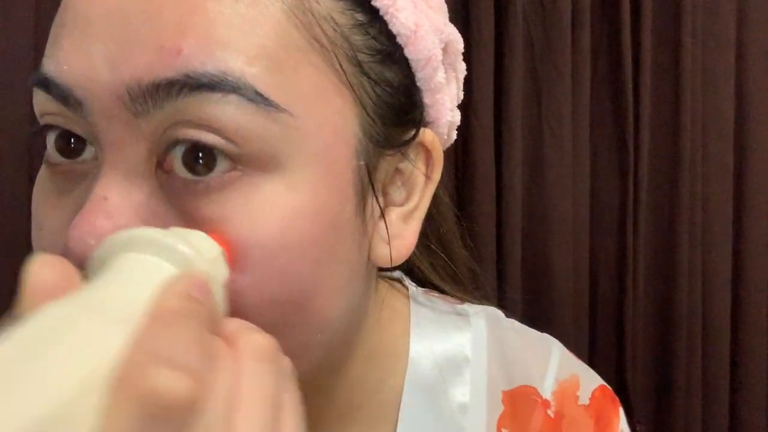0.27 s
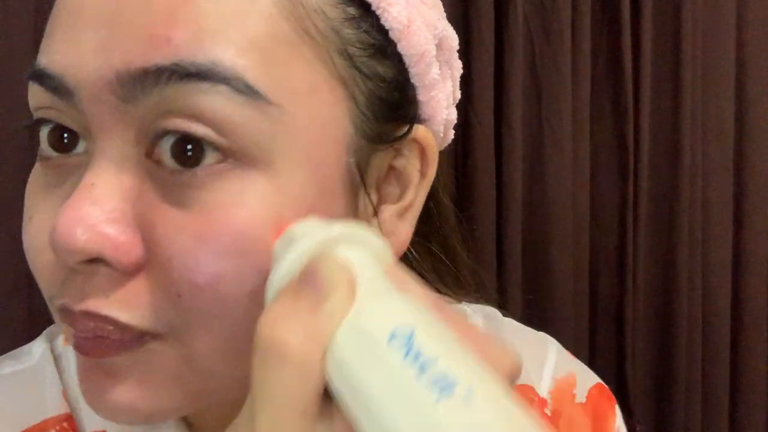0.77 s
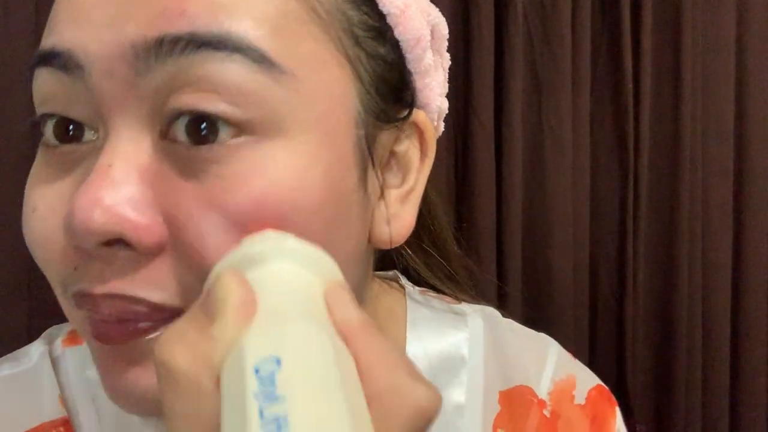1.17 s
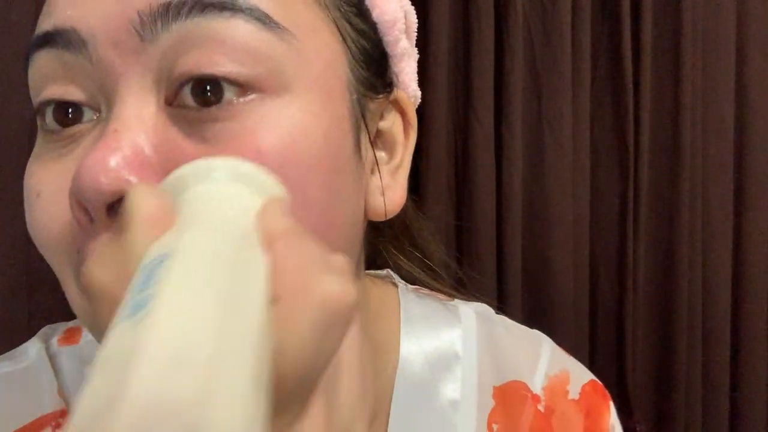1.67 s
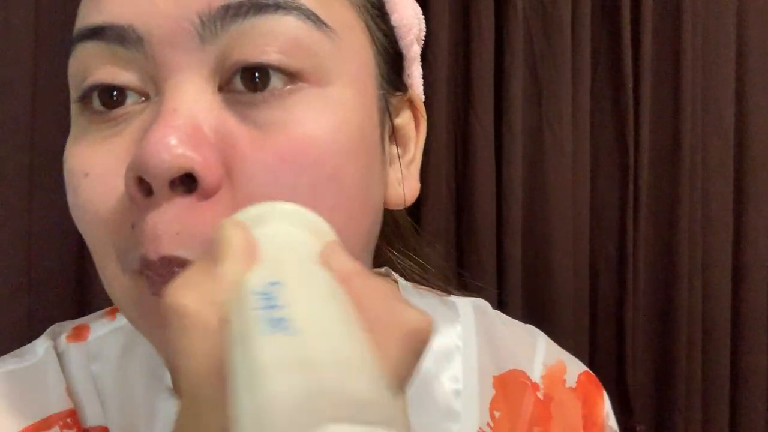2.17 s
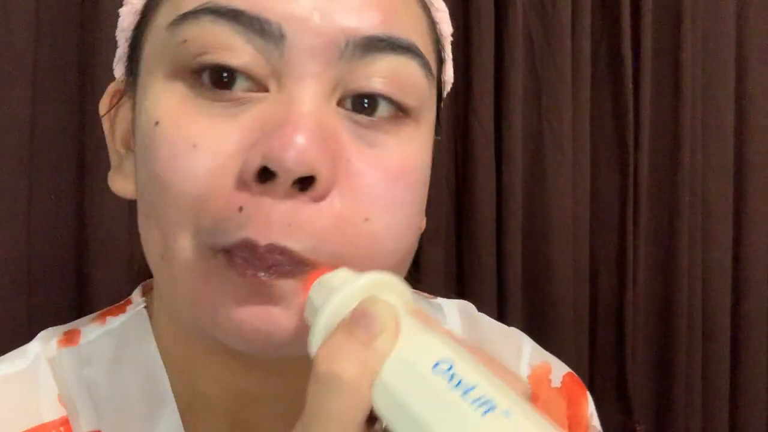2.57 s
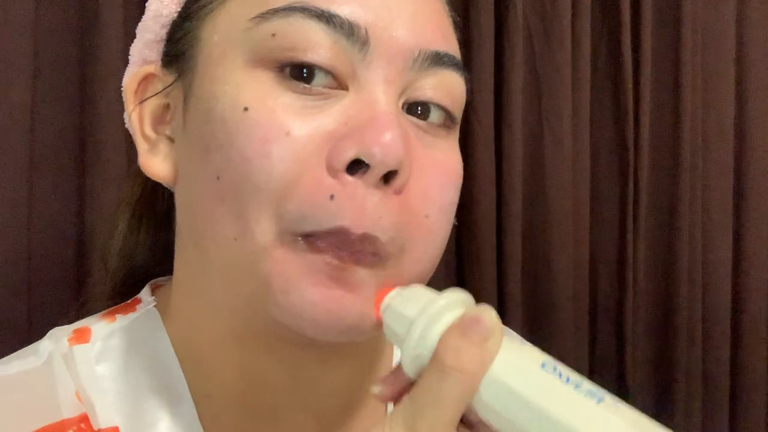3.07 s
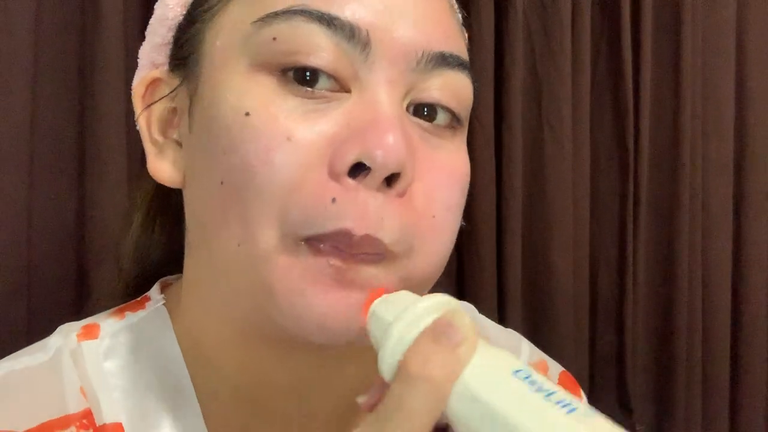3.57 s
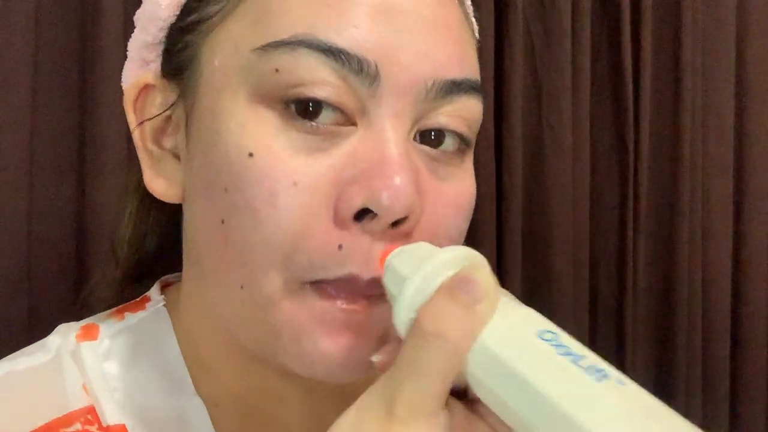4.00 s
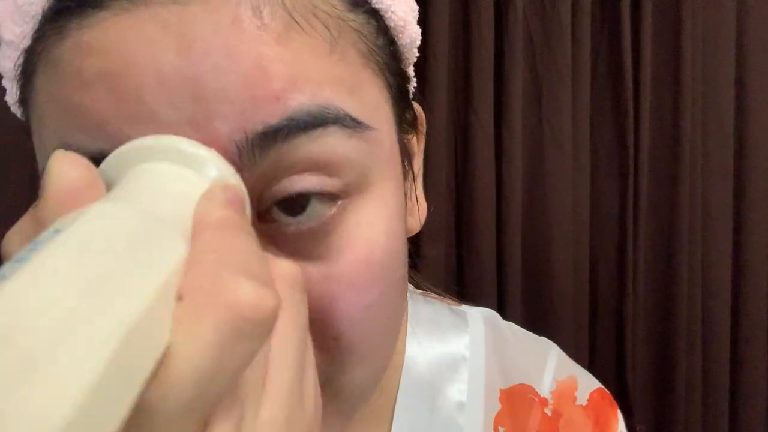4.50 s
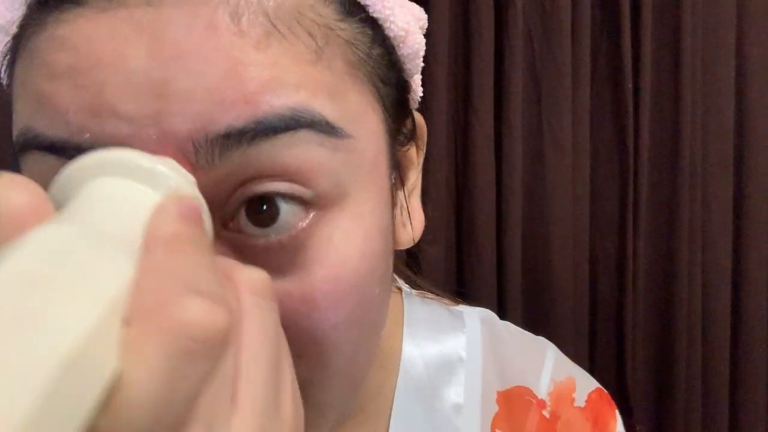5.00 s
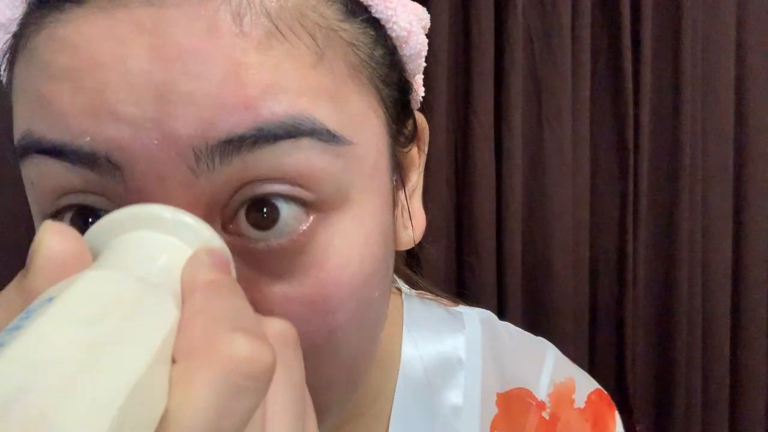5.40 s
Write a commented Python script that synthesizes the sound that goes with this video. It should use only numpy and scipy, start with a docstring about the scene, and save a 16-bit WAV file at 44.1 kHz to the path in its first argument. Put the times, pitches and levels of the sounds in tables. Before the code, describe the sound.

A high-frequency facial wand buzzes close to a phone in a small curtained room. Sixty dry, bright ticks a second fuse into a steady rasp, swelling to rough crackle whenever the glass lifts off the cheek. The chin passage is steadier and thinner; then, after a cut to the brow, the buzz is rougher, with renewed flares. Faint rumble and hiss lie beneath.

```python
"""Over a faint low rumble and hiss, a dry, bright buzz of ticks begins almost at once: a high-frequency
facial wand moves over cheek, chin and brow, close to a phone in a small curtained room. Its coil fires once
per mains cycle: filtered impulses tick while the glass rests on the skin and swell to a rough crackle where
a gap opens and sparks jump. Delayed copies from face and hand colour each tick; filtered noise makes the
rumble, hiss and soft rubs, and short damped tones make the handling knocks."""
import sys
import numpy as np
from scipy import signal
from scipy.fft import rfft, irfft
from scipy.io import wavfile
from scipy.ndimage import map_coordinates

SR = 44100
rng = np.random.default_rng(int(sys.argv[2]) if len(sys.argv) > 2 else 0)


def generate_wav(sig):
    """Save sig (samples, or channels by samples) to the path in sys.argv[1] as 16-bit PCM at SR."""
    pcm = np.round(np.clip(np.atleast_2d(sig).T, -1, 1) * 32767).astype(np.int16)
    wavfile.write(sys.argv[1], SR, pcm)


N = 249165

MAINS_HZ = 59.9593
# strength of the discharge while the glass rests on the skin, and the most that an open gap adds (dB)
FACE_DB, BROW_DB, GAP_GAIN_DB = -39.5, -40.5, 15.5
# slow wavering of the discharge with the pressure of the hand: spread (dB), rate (per s)
WAVER_DB, WAVER_RATE = .6, 28
# firing-to-firing scatter, and echoes from face and hand on cheek and chin (dB)
SCATTER_DB, NEAR_DB = .7, -18.5
# amplitude of side streamers beside the main spark: on cheek and chin, and on the brow
FACE_BRANCH, BROW_BRANCH = .12, .2
# creeping discharges under the main snap, on face and brow with no gap (dB), and their mean delay (s)
FACE_CRACKLE_DB, BROW_CRACKLE_DB, CREEP_S = -19.5, -15, .0005
# how far the turning wand shifts the skew between the ports (share), and how often (per s)
TURN_SHARE, TURN_RATE = .2, 7
# the nearest wall's answer to the snaps on the brow: delay (s), level (dB)
WALL_S, WALL_DB = .009, -22
ROOM_T60_S = .25
TOP_HZ = 16450

# background rumble of the room: frequency_hz, relative_density_db (per Hz)
RUMBLE_COLOUR = [(20, -10.5), (55, 4.5), (85, -5.5), (135, 1.5), (200, -2.5), (270, -10.5), (360, -15),
                 (700, -18), (1500, -20.5), (4000, -31), (16000, -24)]
# faint steady hiss: frequency_hz, relative_density_db (per Hz)
HISS_COLOUR = [(1000, -30), (3000, -16), (5500, -9), (8000, 0), (11000, 0), (16000, -3)]
# firing on cheek and chin, then on the brow: start_s, end_s
FACE_SPAN = (.014, 4.155)
BROW_SPAN = (4.1589, 5.66)
# opening and settling of the gap between glass and skin: widest_s, opening_s, closing_s, relative_gap
# (the gain levels off above a gap of 1)
GAP_OPENINGS = [(.168, 0.025, 0.058, 1), (.28, 0.035, 0.043, 0.22), (.797, 0.031, 0.082, 0.63),
                (1.246, 0.021, 0.27, 0.2), (1.429, 0.01, 0.013, 0.94), (1.595, 0.046, 0.074, 1.94),
                (1.696, 0.02, 0.015, 0.76), (1.84, 0.04, 0.043, 2.4), (2.293, 0.018, 0.035, 0.99),
                (2.736, 0.12, 0.073, 0.15), (3.06, 0.23, 0.064, 0.21), (3.29, .025, 0.038, 0.23),
                (3.39, 0.081, 0.1, 0.27), (3.689, 0.1, 0.23, 0.18), (4.045, 0.096, 0.068, 0.36),
                (4.272, 0.065, 0.03, 0.65), (4.37, 0.053, 0.091, 0.55), (4.476, .008, 0.012, 0.18),
                (4.66, 0.059, 0.073, 0.62), (4.81, 0.089, 0.052, 0.69), (4.995, 0.043, 0.1, 0.6),
                (5.25, 0.06, 0.059, 0.099), (5.44, 0.14, 0.17, 2.4)]
# spectrum of a tick with the glass at rest on each place: frequency_hz, relative_level_db
CHEEK_TICK = [(400, -42.5), (700, -33.5), (1100, -19.5), (1850, -22), (2400, -16), (2900, -14.5),
              (4300, -9.5), (5400, -11.5), (7600, 1), (10000, 6.5), (12700, 4), (15200, 5.5), (16400, -5)]
CHIN_TICK = [(400, -62), (700, -32), (1100, -25), (1800, -26), (2350, -23), (2850, -19.5), (3500, -23),
             (5300, -12), (6500, -9.5), (7600, -0.5), (10000, 2.5), (12700, 3.5), (15200, 5.5),
             (16400, -5.5)]
BROW_TICK = [(400, -37), (700, -22), (1100, -19), (1850, -22.5), (2900, -13), (4300, -12), (5800, -5),
             (7600, -1.5), (10000, 3), (12700, 0.5), (15200, 6), (16400, -0.5)]
# spectrum of an open spark in each place: frequency_hz, relative_level_db
CHEEK_SPARK = [(400, -101), (700, -26), (1100, -29), (1800, -47), (2900, -22), (4300, -13), (5600, -19),
               (7600, 7), (10000, 12.5), (12700, 22), (15200, 10.5), (16400, -7.5)]
BROW_SPARK = [(400, -46), (700, -30), (1100, -22.5), (1850, -23), (2900, -17), (4300, -10.5), (5800, -15),
              (7600, -8), (10000, -3), (12700, 4), (15200, 2), (16400, -10)]
# spectrum of the tiny discharges creeping over the skin: frequency_hz, relative_level_db
CREEP_COLOUR = [(400, -40), (1100, -12), (2300, -3), (3500, 0), (6000, 0), (7500, 0), (10000, -5),
                (16400, -8)]
# resonances of the plastic handle: frequency_hz, width_hz, level_db (before each place's handle_db)
HANDLE_MODES = [(1000, 230, 0.5), (1402, 300, 5), (2307, 203, 4), (3090, 350, -1), (4380, 490, -3.5)]
# slide of the wand from cheek to chin: start_s, end_s
SLIDE_S = (2.3, 2.8)
# body of the snaps, under their bright edge: time_s, gain_db
BODY_GAIN = [(0, -1), (.2, 0.5), (.3, 0.5), (.42, 1.5), (.65, -1), (.8, -2), (1.05, -0.5), (1.45, 0),
             (1.65, 0.5), (1.85, 0.5), (2.1, 1.5), (2.3, 0), (2.6, 1), (2.9, -2), (3.2, -0.5), (3.45, -1.5),
             (3.7, -1), (4.17, 0.5), (4.28, -3.5), (4.42, -1), (4.72, 0.5), (5.15, -0.1), (5.3, 0.5),
             (5.42, -7.5), (5.52, -0.5), (5.64, 4)]
# sizzle of the snaps: time_s, gain_db; and its band: low_hz, high_hz
SIZZLE_GAIN = [(0, 2), (.2, -6.5), (.5, 2.5), (.8, -2.5), (.95, 1), (1.2, 0), (1.35, -5), (1.55, 3.5),
               (1.66, 1), (2, 0), (2.12, 4), (2.27, 0.5), (2.4, 5), (2.52, -2.5), (2.7, 5.5), (2.85, 1.5),
               (3.55, -2), (3.8, 2.5), (3.9, -4), (4.14, -5.5), (4.17, 3), (4.35, .5), (4.8, -0.5),
               (5.3, 2), (5.64, -0.5)]
SIZZLE_HZ = (6100, 8500)
# flicker of the colour from snap to snap: low_hz, high_hz, spread_db
FLICKER_BANDS = [(1700, 3200, 1.4), (3200, 4600, 1.5), (4600, 6300, 1.8), (11500, 16000, .8)]
# bands of the ticks that slowly strengthen or thin out:
# strongest_s, rise_s, fall_s, low_hz, high_hz, gain_db
BAND_SWELLS = [(.12, .25, 0.23, 4100, 5870, 7), (1.08, 0.12, .22, 4600, 5300, -2),
               (2.2, 0.35, 0.28, 3960, 4760, 5.5), (2.75, .12, 0.22, 2700, 3050, -13),
               (3.25, .3, 0.4, 2780, 3120, -15), (3.3, 0.4, 0.57, 6400, 6830, 7),
               (3.98, .28, 0.36, 2550, 2970, -15), (4.05, 0.18, .2, 4000, 4270, 4.5)]
# phase between the phone's two ports: frequency_hz, right_lag_rad (negative lags are scaled by the skew)
PORT_PHASE = [(1900, 0), (2700, -1.8), (3400, -1.3), (4200, -1.2), (4900, -2.3), (5600, -2.4), (6400, -.5),
              (7200, .2), (8700, 3.14), (14650, 15.7), (15600, 17.6)]
# excess of the right port over the left: frequency_hz, level_db
PORT_BALANCE = [(500, 2), (1200, 1), (5000, 3.2), (8000, 1.3), (12000, 0)]
# knocks of handling: centre_s, pitch_hz, gaussian_width_s, peak_db
HANDLING_KNOCKS = [(.8915, 600, .0008, -48), (.902, 500, .0012, -54), (.917, 520, .0012, -55),
                   (1.396, 1570, .004, -60), (1.514, 560, .003, -54), (1.5166, 225, .0034, -33)]
# soft rubs round the mouth: strongest_s, rise_s, fall_s, level_db (before the grain)
RUBS = [(2.62, 0.06, 0.057, -60), (2.8, 0.18, 0.33, -69), (3.3, 0.24, 0.44, -69)]
# spectrum of the rubbing: frequency_hz, relative_density_db (per Hz)
RUB_COLOUR = [(150, -3.5), (400, -12.5), (650, -5.5), (1200, -15), (2000, -31), (4000, -50), (16000, -49)]
# lone snaps between the firings: time_s, level_db (before grip and mixing)
STRAY_SNAPS = [(4.402, -27), (4.418, -22), (4.435, -25), (5.287, -20)]


def undb(db):
    """Amplitude ratio: 20 decibels are a factor of ten."""
    return 10 ** (np.asarray(db) / 20)


def shape_db(points, hz):
    """Spectral envelope: levels interpolated on a log-frequency axis."""
    f, db = np.transpose(points)
    return np.interp(np.log(np.maximum(hz, 1)), np.log(f), db)


def curve_gain(points):
    """Amplitude envelope: decibel levels interpolated in time."""
    return undb(np.interp(np.arange(N) / SR, *np.transpose(points)))


def walk(t, rate):
    """Band-limited random fluctuation: a smooth wander of spread near 1, read at the times t."""
    knots = rng.standard_normal(int(N / SR * rate) + 3)
    return map_coordinates(knots, [t * rate], order=2, mode="nearest")


def swell(t, peak_s, rise_s, fall_s):
    """Asymmetric Gaussian envelope: one smooth movement from 0 up to 1 and back."""
    return np.exp(-((t - peak_s) / np.where(t < peak_s, rise_s, fall_s)) ** 2)


def passband(x, edges_hz, order=2):
    """Zero-phase band-pass filtering: one band of a sound, without delay."""
    return signal.sosfiltfilt(signal.butter(order, edges_hz, "band", fs=SR, output="sos"), x)


def noise(colour, channels=2):
    """Spectral shaping of white noise: independent channels of one colour, rms 1."""
    white = rng.standard_normal((channels, N))
    hz = np.arange(N // 2 + 1) * SR / N
    x = irfft(rfft(white) * undb(shape_db(colour, hz)), N)
    return x / np.std(x)


def room_tone(level_db, side_db):
    """Correlated background noise: a low, steady rumble, nearly the same at both ports."""
    mid, side = noise(RUMBLE_COLOUR)
    return (mid + undb(side_db) * side * np.array([[1], [-1]])) * undb(level_db)


def gap_db(t):
    """Breakdown across a gap: a wider gap gives a louder spark, up to what the coil can deliver."""
    gap = sum(width * swell(t, s, opening, closing) for s, opening, closing, width in GAP_OPENINGS)
    return GAP_GAIN_DB * np.tanh(gap)


def clicks(times, sizes, order=8):
    """Band-limited impulses: a windowed sinc places them between the samples."""
    at = np.ravel(times)[:, None] * SR
    taps = np.floor(at).astype(int) + np.arange(1 - order, order + 1)
    window = np.cos(np.pi / 2 * (taps - at) / order) ** 2
    weights = np.ravel(sizes)[:, None] * np.sinc(taps - at) * window
    inside = (taps >= 0) & (taps < N)
    return np.bincount(taps[inside], weights[inside], N)


def reflected(times, sizes, near_db, first_s=0.000494, reach_s=.0021, drift_s=.00008, hop_s=6e-6, count=14):
    """Early reflections off face, hand and phone: paths drift with the wand and hop at each new spark spot."""
    fade_db = 7
    out = clicks(times, sizes)
    for share in (np.arange(count) + rng.random(count)) / count:
        drift = drift_s * walk(times, 3)
        lag = first_s + reach_s * share + drift + hop_s * rng.standard_normal(len(times))
        polarity = np.sign(rng.standard_normal())
        out = out + clicks(times + lag, sizes * polarity * undb(near_db - fade_db * share))
    return out


def ring(x, colour, handle_db, late_s=0.0005007, late_below_hz=5500, size=2048):
    """Impulse response and modal resonance: a causal snap excites the handle; each impulse keeps its energy."""
    hz = np.arange(size // 2 + 1) * SR / size
    bass_cut = hz ** 2 / (hz ** 2 + 350 ** 2) + 0.00092
    # folding the cepstrum gives minimum phase
    cepstrum = irfft(np.log(undb(shape_db(colour, hz)) * bass_cut))
    cepstrum[1:size // 2] *= 2
    cepstrum[size // 2 + 1:] = 0
    modes = sum(undb(db + handle_db) * 1j * hz * w / (f ** 2 - hz ** 2 + 1j * hz * w)
                for f, w, db in HANDLE_MODES)
    # with late_s above 0, the body of the tick trails its bright edge
    delay_s = late_s / (1 + (hz / late_below_hz) ** 6)
    phase = 2 * np.pi * np.cumsum(delay_s) * SR / size
    snap = irfft(np.exp(rfft(cepstrum) - 1j * phase) * (1 + modes))[:size // 2]
    return signal.fftconvolve(x, snap / np.linalg.norm(snap))[:N]


def crackle(times, sizes, count=12):
    """Creeping surface discharge: tiny, equally strong, irregularly spaced pulses after every firing."""
    lags = CREEP_S * rng.exponential(size=(len(times), count))
    grains = sizes[:, None] * rng.choice([-1, 1], lags.shape) / np.sqrt(count)
    return ring(clicks(times[:, None] + lags, grains), CREEP_COLOUR, handle_db=-53, late_s=0)


def wand(span, contact_db, tick_colours, spark_colour, spark_from_db, branch, branch_s, near_db,
         handle_db, scatter_db, crackle_db, count=3):
    """Periodic discharge: a firing per mains cycle, its energy passing from ticks to branching sparks."""
    t = np.arange(*span, 1 / MAINS_HZ)
    level_db = contact_db + gap_db(t) + WAVER_DB * walk(t, WAVER_RATE)
    size = undb(level_db + scatter_db * rng.standard_normal(len(t))) * np.sqrt(SR / MAINS_HZ)
    sparking = .5 + .5 * np.tanh((level_db - spark_from_db) / 4)
    # the path to the phone changes slowly, and breakdown comes a few microseconds early or late
    t = t + 2e-5 * walk(t, 3.0) + 4e-6 * rng.standard_normal(len(t))
    ticks = reflected(t, size * np.sqrt(1 - sparking), near_db)
    spark_size = size * np.sqrt(sparking / (1 + count * branch ** 2))
    sparks = reflected(t, spark_size, near_db - 3)
    # thin, bright side streamers follow the main spark at random, within a fraction of a millisecond
    lags = np.cumsum(branch_s * rng.uniform(0.69, 1.67, (len(t), count)), axis=1)
    streamer_sizes = spark_size[:, None] * branch * (2 * rng.random(lags.shape) - 1)
    streamers = clicks(t[:, None] + lags, streamer_sizes)
    sparks = sparks + signal.lfilter(*signal.butter(1, 4000, "high", fs=SR), streamers)
    # both fire in the same instant, so where they blend their amplitudes add
    blend = np.interp(np.arange(N) / SR, t, np.sqrt(sparking) + np.sqrt(1 - sparking))
    resting = sum(share * ring(ticks, colour, handle_db) for colour, share in tick_colours)
    creeping = crackle(t, size * undb(crackle_db - 0.42 * gap_db(t)))
    return (resting + ring(sparks, spark_colour, handle_db)) / blend + creeping


def grip(x, split_hz, flicker_rate=48):
    """Time-varying band gain: body and sizzle swell apart from the bright edge, and the colour flickers."""
    t = np.arange(N) / SR
    body = signal.sosfiltfilt(signal.butter(4, split_hz, fs=SR, output="sos"), x)
    x = x + body * (curve_gain(BODY_GAIN) - 1)
    x = x + passband(x, SIZZLE_HZ) * (curve_gain(SIZZLE_GAIN) - 1)
    for low, high, db in FLICKER_BANDS:
        x = x + passband(x, [low, high]) * (undb(db * walk(t, flicker_rate)) - 1)
    return x


def band_swells(x):
    """Time-varying band gain: parts of the ticks' spectrum swell or hollow."""
    t = np.arange(N) / SR
    for s, rise, fall, low, high, db in BAND_SWELLS:
        x = x + passband(x, np.sort([low, high])) * (undb(db * swell(t, s, rise, fall)) - 1)
    return x


def ports(x, skew):
    """Phase and level difference at two receivers: the mid-range lag depends on where the wand is held."""
    hz = np.arange(N + 1) * SR / (2 * N)
    lag = np.interp(hz, *np.transpose(PORT_PHASE))
    lag = np.where(lag < 0, skew * lag, lag)
    right = undb(shape_db(PORT_BALANCE, hz) / 2)
    return irfft(rfft(x, 2 * N) * np.array([1 / right, right * np.exp(-1j * lag)]))[:, :N]


def turning(x, skew):
    """Interference of shifting phases: as the wand turns, a hollow drifts through the mid-range."""
    turn = .5 + .5 * np.tanh(walk(np.arange(N) / SR, TURN_RATE))
    return turn * ports(x, skew * (1 + TURN_SHARE)) + (1 - turn) * ports(x, skew * (1 - TURN_SHARE))


def spread(x, level_db, low_hz, high_hz, reach_s, count=4):
    """Scattering by hand and cheek: short, shifting mid-range paths, of opposite sign at the two ports."""
    n = np.arange(N)
    band = passband(x, [low_hz, high_hz], order=3)
    lags = reach_s * (np.arange(count) + rng.random(count)) / count
    paths = (np.interp(n - SR * (lag + .00012 * walk(n / SR, 23)), n, band) for lag in lags)
    side = sum(paths) / np.sqrt(count)
    return undb(level_db) * side * np.array([[1], [-1]])


def sway(x, path_s, rate=5):
    """Variable propagation delay: the moving hand keeps changing the path to the walls."""
    n = np.arange(N)
    return map_coordinates(x, [n + path_s * SR * walk(n / SR, rate)], order=5, mode="constant")


def room(x, wet_db, t60, curtain_hz, apart_db):
    """Diffuse reverberation: an exponential tail, mostly different at each port, dulled by the curtain."""
    t = np.arange(SR // 2) / SR
    shared, left, right = rng.standard_normal((3, len(t)))
    tail = shared + undb(apart_db) * np.array([left, right])
    tail = tail * undb(-60 * t / t60) * (1 - np.exp(-t / 0.0013))
    tail *= undb(wet_db) / np.linalg.norm(tail, axis=1, keepdims=True)
    dull = signal.lfilter(*signal.butter(1, min(curtain_hz, .45 * SR), fs=SR), x)
    return signal.fftconvolve(dull, tail, axes=1)[:, :N]


def bumps():
    """Heavily damped vibration: soft knocks of the wand in the hand, as tones in Gaussian envelopes."""
    t = np.arange(N) / SR
    return sum(undb(db) * np.exp(-.5 * ((t - s) / width) ** 2) * np.cos(2 * np.pi * hz * (t - s))
               for s, hz, width, db in HANDLING_KNOCKS)


def rubbing(grain_db):
    """Sliding friction: an uneven, dull rustle of noise."""
    t = np.arange(N) / SR
    slide = sum(undb(db) * swell(t, s, rise, fall) for s, rise, fall, db in RUBS)
    return noise(RUB_COLOUR, channels=1) * slide * undb(grain_db * walk(t, 30))


def wall(x):
    """Specular reflection: a single short slap from the nearest wall."""
    late = np.pad(x, (int(WALL_S * SR), 0))[:N]
    return undb(WALL_DB) * ports(sway(late, path_s=0.00023), skew=1.0)


def stray_snaps():
    """Extra breakdown: a few lone sparks on the brow between the regular firings."""
    times, snap_db = np.transpose(STRAY_SNAPS)
    return ring(clicks(times, undb(snap_db)), BROW_SPARK, handle_db=-2)


def scene():
    """Superposition: the wand on the lower face and then on the brow, with its reflections and room."""
    background = room_tone(level_db=-58.5, side_db=-14) + undb(-67) * noise(HISS_COLOUR)
    on_chin = np.interp(np.arange(N) / SR, SLIDE_S, (0, 1))
    face = wand(FACE_SPAN, FACE_DB, [(CHEEK_TICK, 1 - on_chin), (CHIN_TICK, on_chin)], CHEEK_SPARK,
                spark_from_db=-28.5, branch=FACE_BRANCH, branch_s=0.0001, near_db=NEAR_DB,
                handle_db=4, scatter_db=SCATTER_DB, crackle_db=FACE_CRACKLE_DB)
    brow = wand(BROW_SPAN, BROW_DB, [(BROW_TICK, 1)], BROW_SPARK,
                spark_from_db=-35.0, branch=BROW_BRANCH, branch_s=0.0001, near_db=NEAR_DB + 6.5,
                handle_db=2.5, scatter_db=SCATTER_DB, crackle_db=BROW_CRACKLE_DB)
    brow = brow + stray_snaps()
    face, brow = grip(np.array([face, brow]), split_hz=5900)
    face = band_swells(face)
    direct = turning(face, skew=0.78) + turning(brow, skew=0.73)
    near = spread(face + undb(-5) * brow, level_db=0.5, low_hz=2400, high_hz=7250, reach_s=0.001614)
    radiated = sway(undb(-1.0) * (face + brow), path_s=0.000204)
    far = room(ports(radiated, skew=1.0), wet_db=-6.0, t60=ROOM_T60_S, curtain_hz=6860, apart_db=7.5)
    return direct + near + wall(brow) + far + bumps() + rubbing(grain_db=4.0) + background


def record(dry):
    """Band limitation: the phone's elliptic low-pass cuts the top steeply."""
    return signal.sosfilt(signal.ellip(8, .3, 60, TOP_HZ, fs=SR, output="sos"), dry)


dry = scene()
out = record(dry)
generate_wav(out)
```